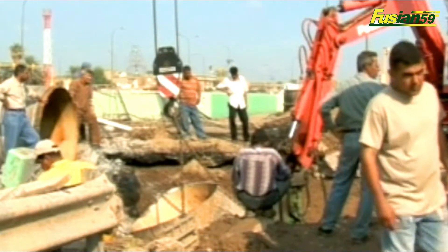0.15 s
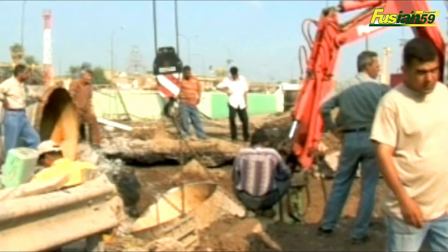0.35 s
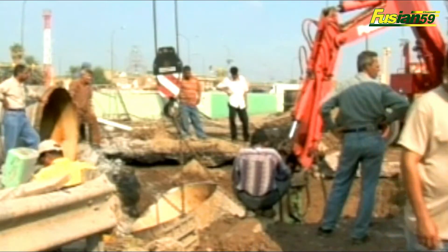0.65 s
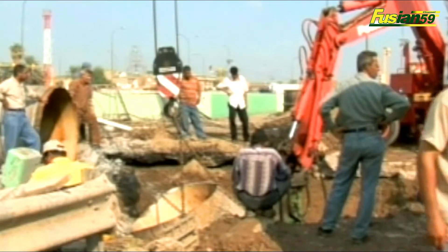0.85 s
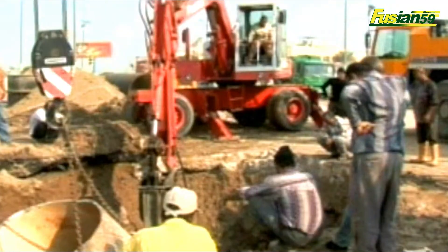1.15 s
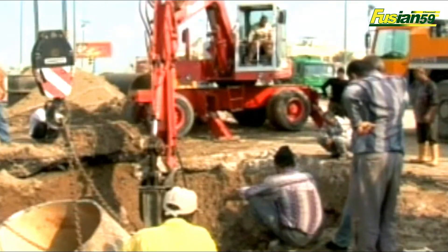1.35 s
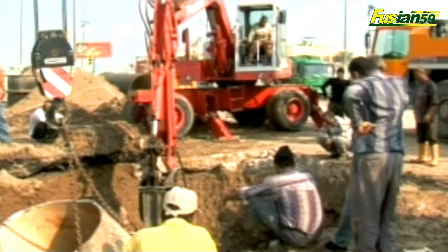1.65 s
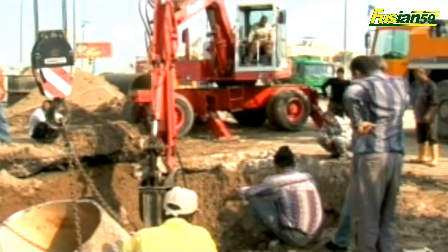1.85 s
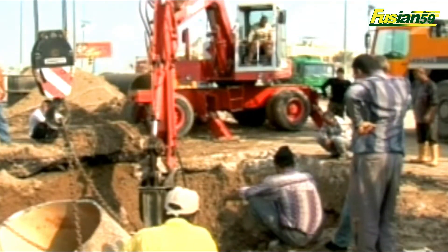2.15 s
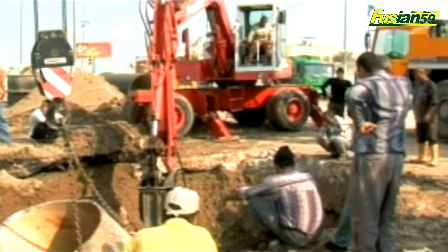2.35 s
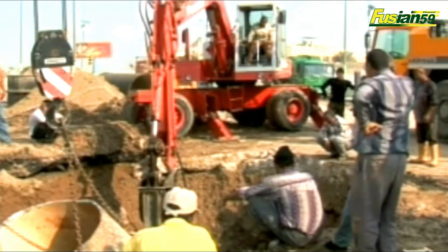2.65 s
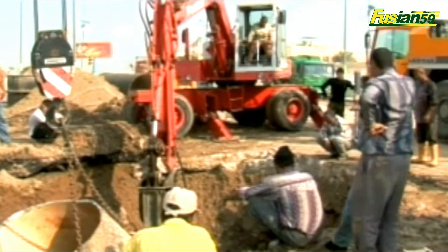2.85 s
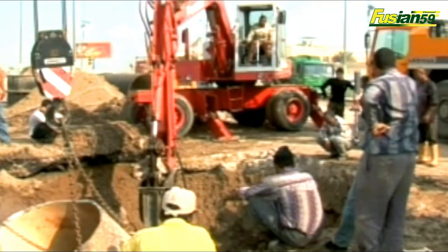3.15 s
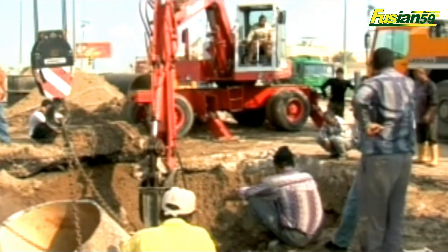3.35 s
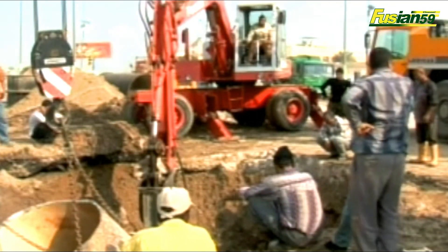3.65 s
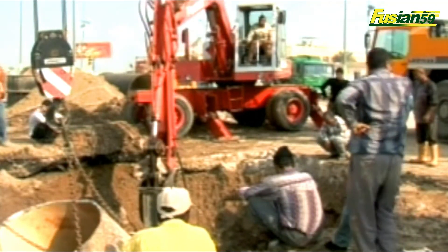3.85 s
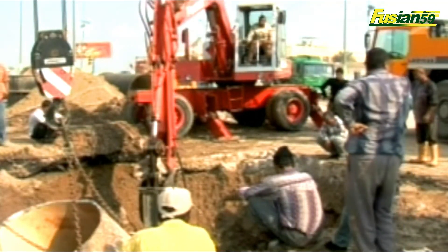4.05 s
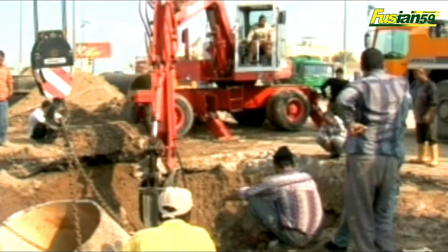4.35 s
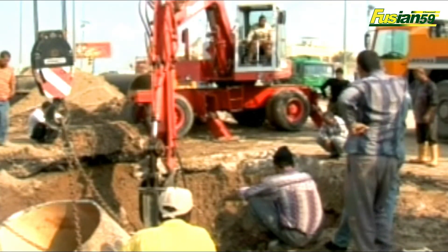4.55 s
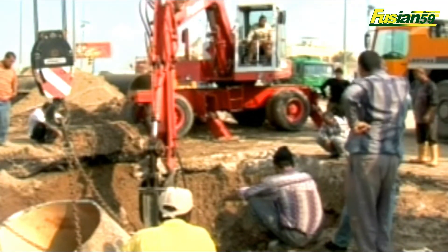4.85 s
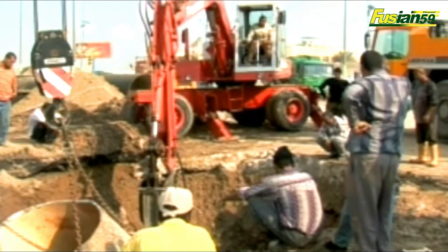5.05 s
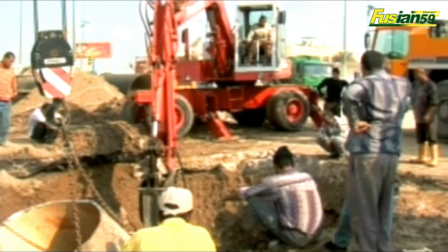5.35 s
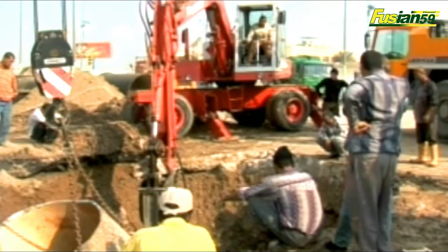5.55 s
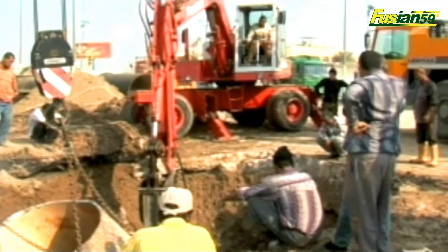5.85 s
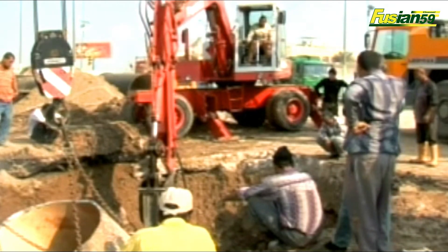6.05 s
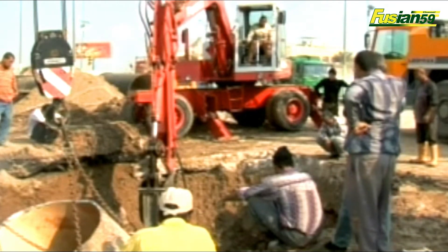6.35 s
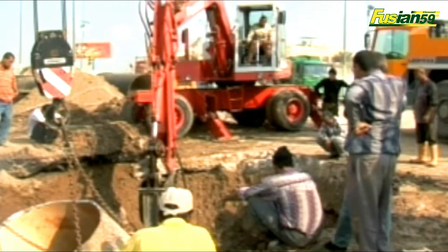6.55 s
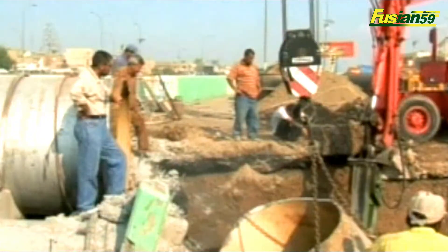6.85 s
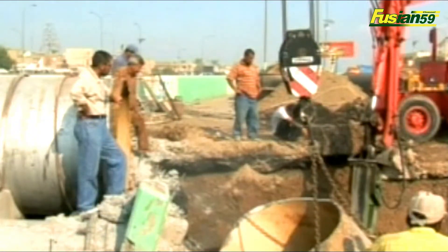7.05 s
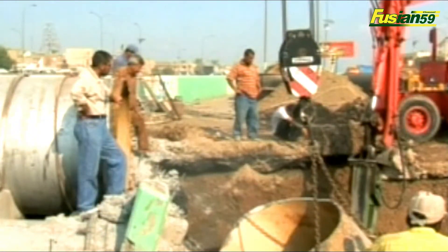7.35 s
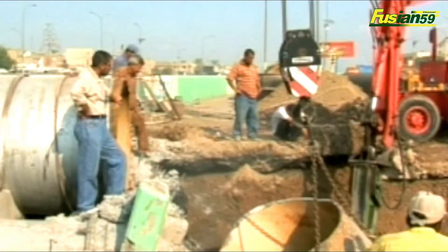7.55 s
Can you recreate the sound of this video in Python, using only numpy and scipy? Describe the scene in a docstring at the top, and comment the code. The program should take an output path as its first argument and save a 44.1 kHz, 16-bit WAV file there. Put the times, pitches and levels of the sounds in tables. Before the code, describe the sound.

A hydraulic breaker hammers rock fast and evenly over a diesel engine, then stops abruptly, leaving machines idling.

```python
"""In a rock trench, an excavator's hydraulic breaker hammers about 4.5 blows a second over its diesel.
Each impact excites the same modes of chisel and housing and scatters off the same trench walls,
so one blow closely resembles the next. High steel clinks sound now and then, one of them the chisel.
The breaker is heard from the side, then from the front, where the level dips briefly. The hammering
is cut off in mid-blow, and idling machines remain, with oil whistling through a valve."""
import sys
import numpy as np
from scipy import signal
from scipy.fft import rfft, irfft
from scipy.io import wavfile
from scipy.ndimage import uniform_filter1d

SR = 44100
rng = np.random.default_rng(int(sys.argv[2]) if len(sys.argv) > 2 else 0)


def wav_record(signal):
    """Record a signal, one row per channel, as 16-bit PCM in the file named by sys.argv[1]."""
    frames = np.transpose(np.atleast_2d(signal))
    bounded = np.clip(frames, -1, 1)
    # unit amplitude maps onto the largest positive 16-bit level
    quanta = np.round(bounded * 32767).astype(np.int16)
    wavfile.write(sys.argv[1], SR, quanta)


N = 340452
TIME = np.arange(N) / SR
AGE = np.arange(24000) / SR  # seconds since an impact
SIDE, FRONT = 0, 1  # listening places


def undb(db):
    """Amplitude ratio: tenfold for every 20 dB."""
    return 10 ** (np.asarray(db) / 20)


def fade(t, t60):
    """Damping: exponential decay by 60 dB in t60 seconds."""
    return np.exp(-np.log(1000) * t / t60)


def across(size, hz, values):
    """Interpolation in log frequency onto the bins of a transform of this size."""
    return np.interp(np.log(np.fft.rfftfreq(size, 1 / SR) + 1), np.log(hz), values)


def colour(white, hz, db):
    """Spectral shaping: unit white noise takes on a density in dB per Hz."""
    size = white.shape[-1]
    return irfft(rfft(white) * undb(across(size, hz, db)), size) * np.sqrt(SR / 2)


def walk(rate_hz):
    """Slow random modulation: held values, smoothed twice, with unit spread."""
    hold = int(SR / rate_hz)
    steps = np.repeat(rng.standard_normal(N // hold + 1), hold)
    slow = uniform_filter1d(uniform_filter1d(steps, hold), hold)[:N]
    return slow / slow.std()


def tone(hz, waver):
    """Frequency modulation: a machine's tone wavers with its speed."""
    pitch_hz = hz * (1 + waver * walk(16))
    return np.sqrt(2) * np.sin(2 * np.pi * np.cumsum(pitch_hz) / SR)


def hiss(hz, width_hz):
    """Resonance narrows white noise to one band, near unit level."""
    q = hz / width_hz
    noise = signal.lfilter(*signal.iirpeak(hz, q, fs=SR), rng.standard_normal(N))
    return signal.lfilter(*signal.iirpeak(hz, q / 2, fs=SR), noise) * np.sqrt(SR / (2 * width_hz))


def oil_valve(ramp_s=.025):
    """Flow noise: each spurt of oil excites the resonances of a valve."""
    # valve resonances: pitch_hz, width_hz, relative_db
    resonances = [(4840, 130, 0), (7550, 770, -7)]
    # spurts of oil: start_s, end_s, level_db
    spurts = [(6.78, 7.03, -70.5), (7.06, 7.1, -69), (7.28, 7.75, -72)]
    whistle = sum(undb(db) * hiss(hz, width) for hz, width, db in resonances)
    flow = sum(undb(db) * np.clip(np.minimum(TIME - start, end - TIME) / ramp_s, 0, 1)
               for start, end, db in spurts)
    return whistle * flow


def idling(knock_hz=26, knock_depth=.1, whine_db=-1, pump_hz=2990, pump_db=-70):
    """Idling diesels knock, modulating their noise; rotating gears and a pump add narrow whines."""
    # noise of machines at idle: frequency_hz, density_db_per_hz
    spectrum = [(25, -104), (60, -95), (120, -93.5), (290, -83.5), (450, -88), (700, -86.5), (930, -90),
                (1100, -85.5), (2000, -94.5), (2400, -92), (3400, -103), (4400, -100.5), (5600, -107),
                (14000, -121)]
    # gear whines: pitch_hz, relative_db
    gears = [(290.7, -79), (742.9, -74), (1071, -74), (1270, -74), (2363, -74)]
    noise = colour(rng.standard_normal(N), *np.transpose(spectrum))
    knock = 1 + knock_depth * tone(knock_hz, waver=.047)
    whines = sum(undb(db + 2 * walk(6)) * tone(hz, waver=.003) for hz, db in gears)
    pump = undb(pump_db) * hiss(pump_hz, width_hz=120)
    return noise * knock + undb(whine_db) * whines + pump + oil_valve()


def diesel(place, firing_hz=103, firing_db=-68.5, throb=.056, waver_db=-1.55):
    """Periodic combustion gives a firing tone and modulates the amplitude of the engine's roar."""
    # roar under load: frequency_hz, side_db_per_hz, front_db_per_hz
    spectrum = [(25, -100, -116), (55, -101, -97), (116, -85, -96), (366, -80.5, -76.5), (1250, -82, -81),
                (2010, -92.5, -89), (3770, -95.5, -97), (4940, -104, -101), (7000, -107, -105),
                (9700, -114, -112), (13200, -122, -121)]
    hz, *db = np.transpose(spectrum)
    firing = tone(firing_hz, waver=.0069)
    roar = colour(rng.standard_normal(N), hz, db[place]) * (1 + throb * firing)
    return roar * undb(waver_db * walk(2.98)) + undb(firing_db) * firing


def clinks(t60=.18, rise_s=.0017, split_hz=22, faint_count=8):
    """Beating of two close modes: high steel clinks, one of them the chisel ringing out after a blow."""
    # the louder clinks, the second being the chisel: start_s, pitch_hz, level_db
    loud = [(.76, 6950, -44), (.99, 6930, -44), (3.445, 7470, -56), (4.785, 6990, -52), (5.89, 7470, -49)]
    faint_s = rng.uniform(2.4, 5.7, faint_count)
    faint_hz = rng.choice((6990, 7470), faint_count)
    faint_db = -62 + 4 * rng.standard_normal(faint_count)
    envelope = fade(AGE, t60) * (1 - np.exp(-AGE / rise_s))
    out = np.zeros(N + len(AGE))
    for t, hz, db in loud + list(zip(faint_s, faint_hz, faint_db)):
        pair = np.sin(2 * np.pi * hz * AGE) + .3 * np.sin(2 * np.pi * (hz + split_hz) * AGE)
        start = int(t * SR)
        out[start:start + len(AGE)] += undb(db) * pair * envelope
    return out[:N]


def site_echo(x, echo_db=-25, t60=1.0, rise_s=.14, dull_hz=3000):
    """Reverberation: machines and far walls return a dull, faint wash."""
    t = np.arange(SR) / SR
    echo = rng.standard_normal(SR) * fade(t, t60) * (1 - np.exp(-(t / rise_s) ** 2))
    echo = signal.sosfilt(signal.butter(1, dull_hz, fs=SR, output="sos"), echo / np.linalg.norm(echo))
    return undb(echo_db) * signal.fftconvolve(x, echo)[:len(x)]


def scatter(count, drift=.45, grit=.2, memory=.85, t60=.24):
    """Diffuse reflection, a row per blow: the pattern drifts as the chisel sinks, with fresh grit."""
    walls, moving = rng.standard_normal((2, len(AGE)))
    rows = []
    for step, fresh in rng.standard_normal((count, 2, len(AGE))):
        moving = memory * moving + np.sqrt(1 - memory ** 2) * step
        rows.append(np.sqrt(1 - drift ** 2 - grit ** 2) * walls + drift * moving + grit * fresh)
    # the reflections share their energy evenly over all pitches
    window = fade(AGE, t60)
    power = uniform_filter1d(np.mean(abs(rfft(rows * window)) ** 2, axis=0), size=25)
    return irfft(rfft(np.array(rows)) / np.sqrt(power / np.sum(window ** 2)))


def overtones(spread_db=2.8, spacing_hz=70, from_hz=1500):
    """High modal density: crowded resonances of the steel put peaks and dips across the treble."""
    hz = np.fft.rfftfreq(len(AGE), 1 / SR)
    centres = np.arange(0, SR / 2, spacing_hz)
    gain = np.interp(hz, centres, undb(spread_db * rng.standard_normal(len(centres))))
    return np.where(hz > from_hz, gain / np.sqrt(uniform_filter1d(gain ** 2, size=500)), 1)


def clatter(count, place, direct=.22, hold_s=.011, crack_s=.0021, contact_s=.0006):
    """Direct sound arrives at once; wall reflections build up, hold and decay, the treble first."""
    # clatter of rock and casing: frequency_hz, side_db_per_hz, front_db_per_hz, rise_s, t60_s
    bands = [(25, -92, -94, .015, .35), (50.4, -94, -75, 0.0099, 0.23), (112, -74.5, -68.5, 0.032, 0.29),
             (233, -59, -61.5, 0.0062, 0.3), (686, -56.5, -57, 0.012, 0.19),
             (1360, -60, -54.5, 0.0076, 0.21), (2025, -68.5, -58, 0.00075, 0.25),
             (2960, -66, -66.5, 0.0027, 0.23), (3410, -64.5, -60, 0.0023, 0.21),
             (5560, -76.5, -73.5, 0.0017, 0.2), (7020, -75, -74.5, 0.0022, 0.2),
             (10970, -84.5, -83.5, 0.00093, 0.15), (13700, -99, -99, .0005, 0.16)]
    # contact crack and its reflection from the trench wall: delay_s, side_db, front_db
    cracks = [(.002, -5.5, -6.5), (0.015, -3, -8.5)]
    hz, *db, rise, t60 = np.transpose(bands)
    spectrum = rfft(colour(scatter(count), hz, db[place])) * overtones()
    body = 0
    for band, rise_s, t60_s in zip(np.eye(len(hz)), rise, t60):
        swell = 1 - (1 - direct) * np.exp(-AGE / rise_s)
        decay = fade(np.maximum(AGE - hold_s - 2 * rise_s, 0), t60_s)
        body = body + swell * decay * irfft(spectrum * across(len(AGE), hz, band))
    spikes = sum(undb(crack_db[place]) * np.exp(-((AGE - delay_s) / crack_s) ** 2)
                 for delay_s, *crack_db in cracks)
    contact = 1 - np.exp(-AGE / contact_s)
    return contact * (body + spikes * irfft(spectrum))


def modes(count, hz, t60, db, onset, vary_db, detune):
    """Superposed damped modes, a row per blow; the chisel seats a little differently each time."""
    phase = rng.uniform(0, 2 * np.pi, len(hz))
    level_draw, seating = rng.standard_normal((count, 2, len(hz))).swapaxes(0, 1)
    amplitudes = undb(db + vary_db * level_draw) * np.exp(1j * (phase + .42 * seating))
    vibrations = np.exp(2j * np.pi * hz[:, None] * AGE) * fade(AGE, t60[:, None]) * onset
    rings = (amplitudes @ vibrations).imag
    pitch_ratios = 1 + detune * seating[:, 0]
    return np.array([np.interp(AGE * ratio, AGE, ring) for ratio, ring in zip(pitch_ratios, rings)])


def housing(count, place):
    """Modal ringing: the heavy casing clangs, and its larger panels take a moment to build up."""
    # modes of housing and boom: pitch_hz, rise_s, t60_s, side_db, front_db
    resonances = [(104.6, 0.013, 0.2, -37.5, -42.5), (214, 0.0025, 0.14, -41, -41.5),
                  (318, 0.0034, 0.089, -21.5, -51), (387, 0.0015, 0.16, -30, -27.5),
                  (417.3, 0.0035, 0.31, -44, -27.5), (535, 0.007, 0.13, -31.5, -59),
                  (664.6, 0.0082, 0.13, -40, -25.5), (749.5, 0.0083, 0.12, -24, -59),
                  (805, 0.0078, 0.37, -34.5, -27), (939, 0.01, 0.17, -42, -18.5),
                  (968.3, 0.015, 0.12, -41, -13.5), (1189, 0.0012, 0.11, -44, -25),
                  (1215, 0.0047, 0.18, -60, -25), (1297, 0.0026, 0.24, -42, -27.5),
                  (1438, 0.01, 0.18, -34, -30.5), (1481, 0.015, 0.14, -26, -29),
                  (1540, 0.0031, 0.18, -35, -39), (1610, 0.013, 0.15, -26.5, -54),
                  (1853.8, 0.0034, 0.51, -51, -31.5), (1887, 0.0048, 0.66, -48, -30),
                  (2217, 0.01, 0.21, -61, -34), (2352, 0.011, 0.17, -64, -37.5),
                  (3230, 0.0066, 0.26, -43, -34.5), (3378, 0.0016, 0.27, -51, -38),
                  (3640, 0.0064, 0.11, -52, -35), (3905, 0.00078, 0.13, -55, -34.5)]
    hz, rise, t60, *db = np.transpose(resonances)
    bloom = 1 - np.exp(-(AGE / rise[:, None]) ** 2)
    return modes(count, hz, t60, db[place], bloom, vary_db=1.4, detune=.00047)


def chisel(count, place, rebound_s=.014, rise_s=.0043, gain_db=4):
    """Contact damping mutes the chisel on the rock; it rings freely once it rebounds."""
    # modes of the free chisel: pitch_hz, t60_s, side_db, front_db
    resonances = [(2528, 0.34, -42, -41), (3277, 0.33, -41.5, -37), (3291, 0.25, -39, -35),
                  (4140, 0.21, -37, -59), (4180, 0.2, -36.5, -36.5), (6120, 0.19, -49, -44.5),
                  (7000, 0.19, -51, -45), (7250, 0.17, -58, -57)]
    hz, t60, *db = np.transpose(resonances)
    freed = 1 - np.exp(-(np.maximum(AGE - rebound_s, 0) / rise_s) ** 2)
    return modes(count, hz, t60, db[place] + gain_db, freed, vary_db=1.5, detune=.0015)


def strokes(first_s, until_s):
    """Blow times, one period of the stroke rate apart, beginning a stroke before first_s."""
    # stroke rate, which follows the oil flow: time_s, rate_hz
    rates = [(.8, 4.358), (1.1, 4.488), (2.9, 4.498), (5.2, 4.467), (6.5, 4.482)]
    period = lambda t: 1 / np.interp(t, *np.transpose(rates))
    times = [first_s - period(first_s), first_s]
    while times[-1] + period(times[-1]) < until_s:
        times.append(times[-1] + period(times[-1]))
    return np.array(times)


def breaker(run, until_s, place, blow_vary_db=.48, ping_vary_db=1.5, thump_hz=225):
    """Impact excitation: each blow clatters, clangs the housing, pings the chisel, thumps the ground."""
    # how freely the chisel pings as it works into the rock: time_s, gain_db
    freedom = [(.5, 0), (.96, 3.5), (1.12, -1), (5.3, 0.5), (6.7, -2)]
    first_s, strength_db, housing_db, thump_db = run
    times = strokes(first_s, until_s)
    count = len(times)
    ping_draw, blow_draw = rng.standard_normal((count, 2)).T
    ping_db = np.interp(times, *np.transpose(freedom)) + ping_vary_db * ping_draw
    blows = clatter(count, place) + undb(housing_db) * housing(count, place)
    blows += undb(ping_db)[:, None] * chisel(count, place)
    out = np.zeros(N + 2 * SR)  # a second of margin at each end
    for t, gain, blow in zip(times, undb(strength_db + blow_vary_db * blow_draw), blows):
        start = int((t + 1) * SR)
        out[start:start + len(AGE)] += gain * blow
    out += undb(thump_db) * signal.sosfilt(signal.butter(1, thump_hz, fs=SR, output="sos"), out)
    return (out + site_echo(out))[SR:SR + N]


def after(t, ramp_s=.002):
    """A gain step from 0 to 1, ramped linearly around time t."""
    return np.clip((TIME - t) / ramp_s + .5, 0, 1)


def dip(at_s, fall_s=.076, rise_s=.069):
    """A gain envelope that sinks to silence for a moment and comes back."""
    ramps = np.maximum((at_s - TIME) / fall_s, (TIME - at_s) / rise_s)
    return np.minimum(ramps, 1) ** 1.1


def scene(move_s=1.053, dip_s=2.922, stop_s=6.758):
    """Breaker and diesel superpose: one run from the side, two from the front, then abruptly idle."""
    # runs of even hammering: start_s, strength_db, housing_db, thump_db
    runs = [(.0394, -1.35, 4, -22), (1.114, 0, 0.3, -13.5), (2.9403, -0.34, 1, -32)]
    moved, resumed, stopped = after(move_s), after(dip_s), after(stop_s)
    side = breaker(runs[0], move_s, SIDE) + diesel(SIDE)
    front = (1 - resumed) * breaker(runs[1], dip_s, FRONT) + resumed * breaker(runs[2], stop_s, FRONT)
    front += diesel(FRONT)
    working = ((1 - moved) * side + moved * front + clinks()) * dip(dip_s)
    return ((1 - stopped) * working + stopped * idling())[None]


def record(dry, ceiling=.72, top_hz=13500):
    """Soft saturation rounds the highest peaks, and a steep low-pass cuts the top."""
    rounded = ceiling * np.tanh(dry / ceiling)
    return signal.sosfilt(signal.ellip(8, .2, 70, top_hz, fs=SR, output="sos"), rounded)


dry = scene()
out = record(dry)
wav_record(out)
```